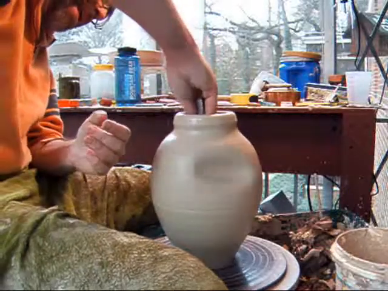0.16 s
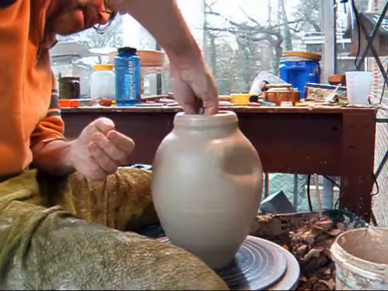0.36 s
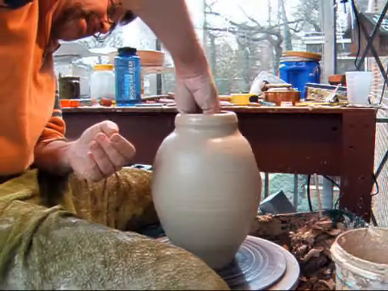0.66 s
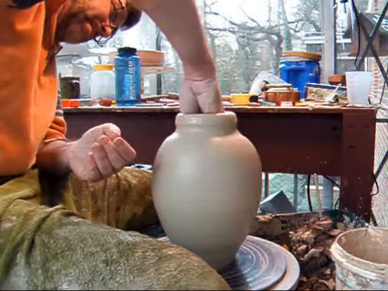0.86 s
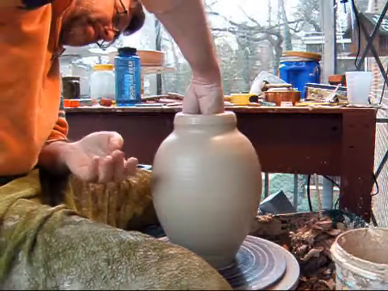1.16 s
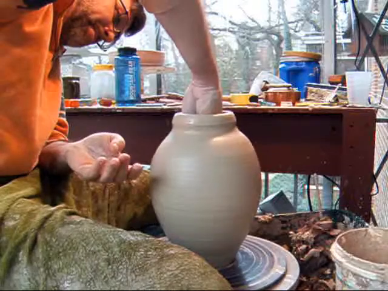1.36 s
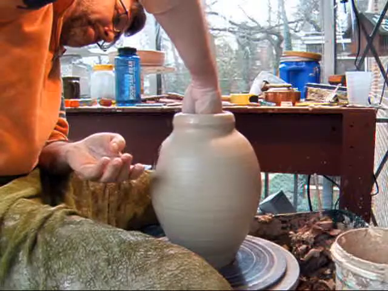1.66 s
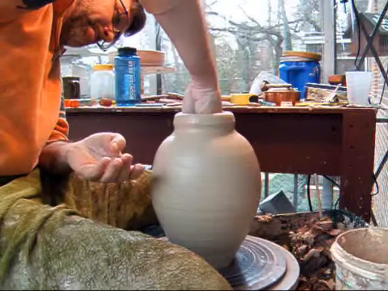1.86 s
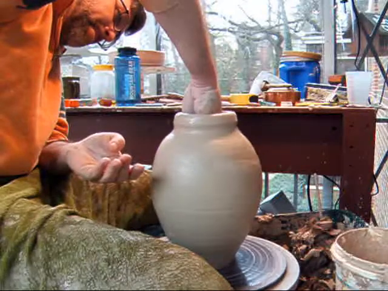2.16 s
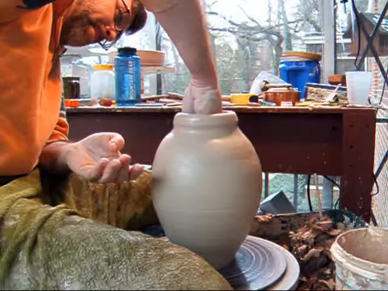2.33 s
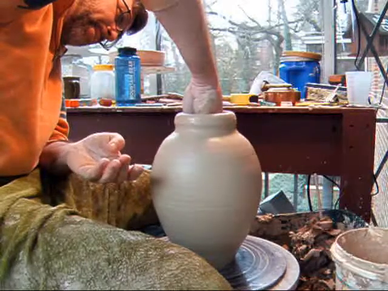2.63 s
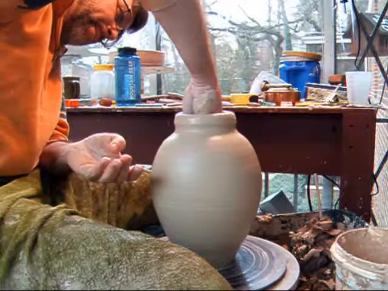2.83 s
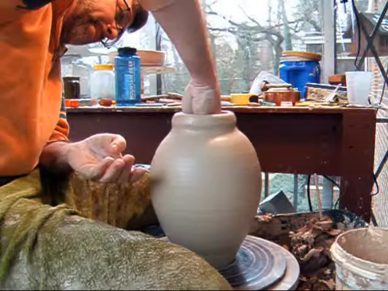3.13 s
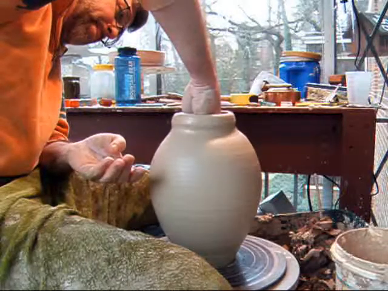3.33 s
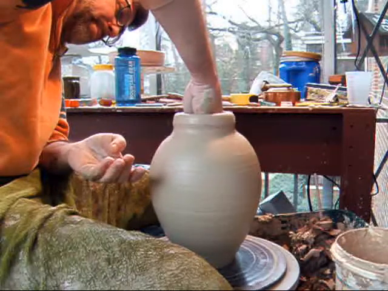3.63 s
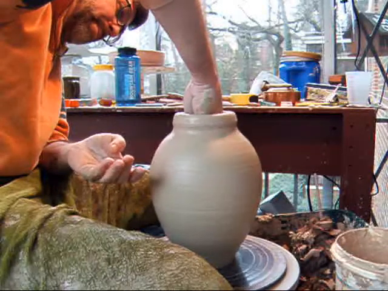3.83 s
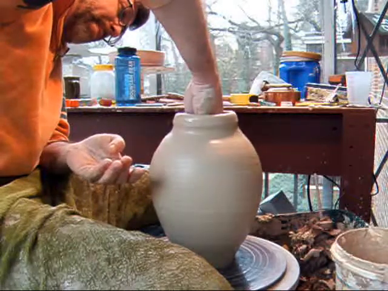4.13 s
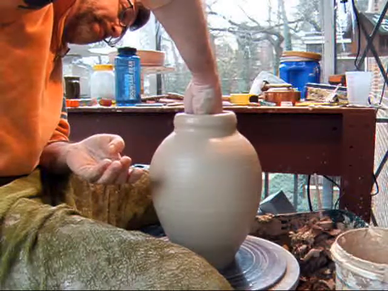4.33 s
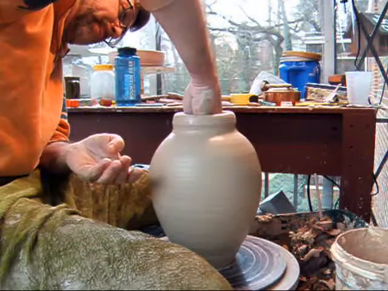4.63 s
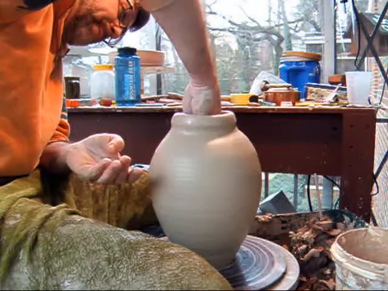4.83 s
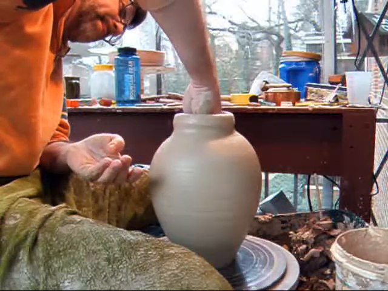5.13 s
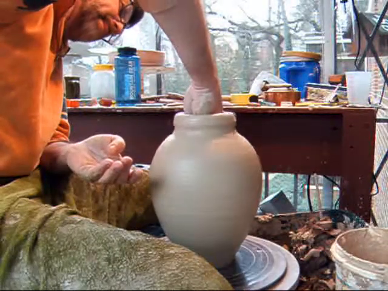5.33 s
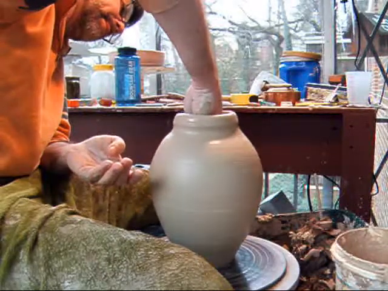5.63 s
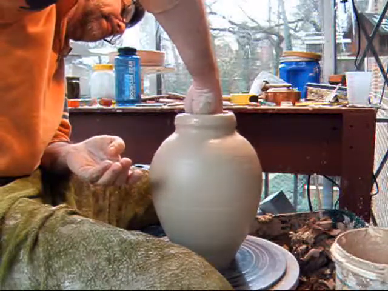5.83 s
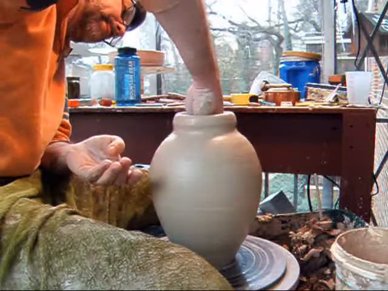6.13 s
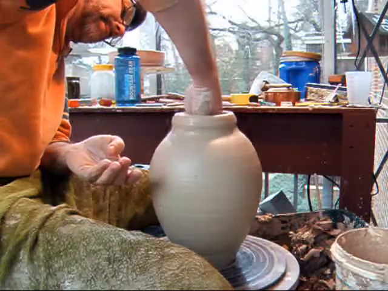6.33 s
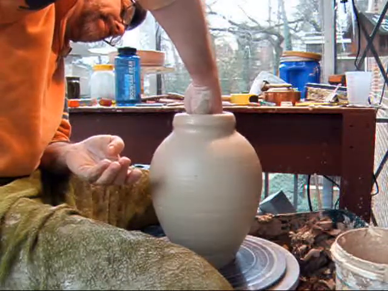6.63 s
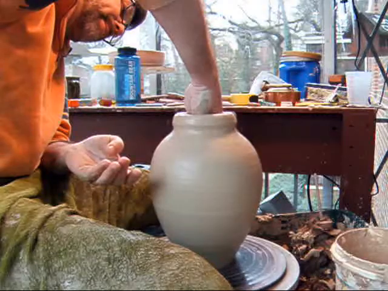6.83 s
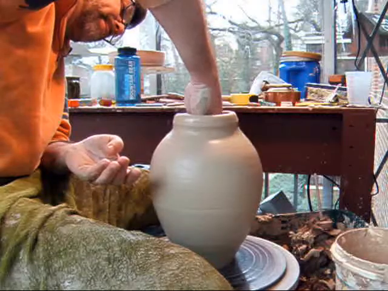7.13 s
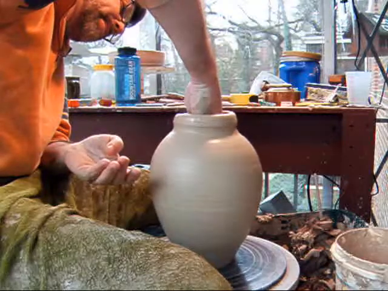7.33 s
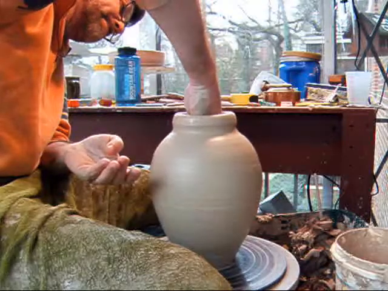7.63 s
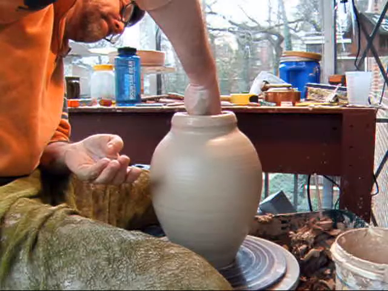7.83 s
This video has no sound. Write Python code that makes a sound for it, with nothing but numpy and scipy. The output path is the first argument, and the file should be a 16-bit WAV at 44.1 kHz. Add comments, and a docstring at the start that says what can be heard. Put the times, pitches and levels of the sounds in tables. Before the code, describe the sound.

An electric pottery wheel hums with a steady low mains buzz and soft whirr, swelling gently each turn, while a faint distant rumble grows late.

```python
"""An electric potter's wheel turns slowly in a quiet workshop while a hand shapes a vase from inside.
Rectified mains current kicks the motor about 120 times a second: a harmonic series, part of which swells
with every turn of the wheel. Filtered noise gives the whirr of the drive, pulsing sines a thin electronic
whine, short noise bursts two faint touches, and low resonant noise a far rumble that dips and then grows."""
import sys
import numpy as np
from scipy import signal
from scipy.fft import rfft, irfft
from scipy.io import wavfile

SR = 44100
rng = np.random.default_rng(int(sys.argv[2]) if len(sys.argv) > 2 else 0)


def file_out(sig):
    """Save sig as 16-bit WAV at sys.argv[1]."""
    # one column per channel
    cols = np.atleast_2d(sig).T
    # limit, then scale
    lim = np.clip(cols, -1, 1)
    pcm = np.round(lim * 32767).astype(np.int16)
    wavfile.write(sys.argv[1], SR, pcm)


N = 352312
TIME = np.arange(N) / SR  # s
BINS = np.fft.rfftfreq(N, 1 / SR)  # Hz
KICK_HZ = 120.03  # rate of the rectified mains pulses


def amp(db):
    """Converts a level in decibels to an amplitude ratio."""
    return 10 ** (np.asarray(db) / 20)


def unit(x):
    """Normalises a signal to an rms of 1."""
    return x / np.sqrt(np.mean(x ** 2) + 1e-30)


def noise(gain):
    """Spectral shaping: white noise weighted by a gain in each frequency bin, at rms 1."""
    spectrum = rfft(rng.standard_normal(N)) * gain
    return unit(irfft(spectrum, N))


def drift(rate_hz):
    """Slow random modulation: noise under a Gaussian low-pass of about the given rate, at rms 1."""
    grid = np.arange(0, 2 * TIME[-1], 1 / 200)
    hz = np.fft.rfftfreq(len(grid), grid[1])
    low_pass = np.exp(-(hz / rate_hz) ** 2)
    slow = irfft(rfft(rng.standard_normal(len(grid))) * low_pass, len(grid))
    return np.interp(TIME, grid, unit(slow))


def bell(hz, width):
    """Resonance curve: gain 1 at the centre and one half at the edges of the width in Hz."""
    return 1 / (1 + ((BINS - hz) / (width / 2)) ** 2)


def ringing(modes):
    """Modal filtering: noise of rms 1 coloured by a sum of resonances."""
    gain = sum(amp(db) * bell(hz, width) for hz, width, db in modes)
    return noise(gain)


def motor(slip_turns=0.0025, waver_db=0.6, waver_hz=9):
    """Periodic excitation: current pulses kick the housing into partials that follow mains, wheel and load."""
    # Partials of the hum. Each row: multiple of the kick rate, rms level in dB before swell and waver.
    partials = [(1, -41.2), (2, -50.1), (3, -38.0), (4, -40.0), (5, -40.2), (6, -67.0), (7, -66.0),
                (8, -55.6), (9, -54.1), (10, -60.5), (11, -67.4), (12, -59.4), (13, -58.2), (14, -58.9),
                (15, -48.5), (16, -68.7), (17, -73.9), (18, -77.7), (19, -70.6), (20, -72.6)]
    # Partials that follow wheel and load. Each row: multiple, depth of the swell in dB, dB per dB of load.
    followers = [(1, -1.8, -0.25), (3, 0, 1.0), (4, 9.7, 1.15)]
    # Load on the motor while the hand shapes the vase. Each row: time in seconds, load in dB.
    load = [(0, -1.2), (1.3, -1.9), (1.8, 0.8), (3.0, -0.5), (3.7, 0.3), (5.3, 0.8), (7.99, 0.3)]
    multiples, level_db = np.transpose(partials)
    swell = wheel_swell()
    load_db = np.interp(TIME, *np.transpose(load))
    swell_db = {round(k): depth_db * swell + follow * load_db for k, depth_db, follow in followers}
    # the lowest partial surges once, briefly
    surge_s, surge_width_s, surge_db = 4.1, 0.08, 1
    swell_db[1] = swell_db[1] + surge_db * np.exp(-((TIME - surge_s) / surge_width_s) ** 2)
    # phase of the kicks in cycles, with a slight slip
    cycles = KICK_HZ * TIME + slip_turns * drift(1.4)
    # frame and room delay the higher partials more, which spreads each kick into a smooth buzz
    smear_rad = 1.06
    phases = causal_phase(level_db) - smear_rad * multiples ** 2
    hum = np.zeros(N)
    for k, db, phase in zip(multiples, level_db, phases):
        gain = amp(db + swell_db.get(k, 0) + waver_db * drift(waver_hz))
        hum += np.sqrt(2) * gain * np.cos(2 * np.pi * k * cycles + phase)
    return hum


def causal_phase(level_db):
    """Minimum phase: the Hilbert transform of log gain gives each harmonic's phase after a sharp kick."""
    log_gain = np.log(amp(np.r_[level_db.min(), level_db, level_db[-1]]))
    # mirrored, so that the spectrum closes into a circle
    circle = np.r_[log_gain, log_gain[-2:0:-1]]
    return -signal.hilbert(circle).imag[1:len(level_db) + 1]


def wheel_swell():
    """Modulation by rotation: a slow rise, a hold and a quicker fall in each turn; height 1, mean 0."""
    # Turns of the wheel. Each entry: start of a turn in seconds.
    turn_starts = [-1.2, 0.62, 2.59, 4.33, 5.87, 7.38, 8.86]
    rise_share, hold_share = 0.49, 0.32  # shares of a turn; the fall takes the rest
    angle = np.interp(TIME, turn_starts, np.arange(len(turn_starts))) % 1
    rise = angle / rise_share
    fall = (1 - angle) / (1 - rise_share - hold_share)
    swell = np.clip(np.minimum(rise, fall), 0, 1)
    return swell - swell.mean()


def whirr(mean_db=-43, swell_db=0.14, rise_db=0.85, pulsing=0.055):
    """Friction noise: belt and bearings rub through the frame's resonances and pulse with motor torque."""
    # Whirr of the drive and hiss of the room. Each row: frequency in Hz, relative density in dB per Hz.
    spectrum = [(25, -18), (50, -16), (85, -2.5), (160, -4), (250, -4.5), (340, 0), (520, -4), (820, -6),
                (1200, -13), (1750, -14.5), (2100, -17), (5500, -21), (8000, -24), (14500, -28.5)]
    # Resonances of the wheel's frame. Each row: frequency in Hz, width in Hz, lift in dB.
    frame = [(191, 11, 2.5), (214, 15, 4.5), (276, 12, -1), (350, 17, 4), (596, 6.4, -8), (836, 6.9, 8.5),
             (1693, 30, 6), (1838, 12, 1.5), (2270, 17, 6.5)]
    hz, db = np.transpose(spectrum)
    colour_db = np.interp(np.log(BINS + 1), np.log(hz), db)
    colour_db += sum(lift * bell(f, width) for f, width, lift in frame)
    torque = 1 + pulsing * np.cos(2 * np.pi * KICK_HZ * TIME)
    # nearly even, a little louder from start to end
    level_db = mean_db + rise_db * (TIME / TIME[-1] - 0.5) + swell_db * drift(6.3)
    return amp(level_db) * torque * noise(amp(colour_db))


def whine(wander_rad=0.7, flutter_db=1.0, swell_db=2.0):
    """Amplitude modulation: high tones pulse with the mains; the more they pulse, the more they swell."""
    # Tones of the electronics. Each row: frequency in Hz, rms level in dB before any modulation,
    # depth of the pulsing at the kick rate as a ratio.
    tones = [(7800, -79, 0), (8200, -78, 0), (10301, -75.5, 0.3), (11621, -77, 1.9), (12581, -76.5, 1.8),
             (13902, -74.5, 0.4), (14201, -67, 0.4), (14441, -79, 1.5), (14921, -79, 1.4),
             (15402, -69.5, 0.1)]
    wander = wander_rad * drift(5)  # shared by all tones
    turn_db = swell_db * wheel_swell()
    ripple = np.cos(2 * np.pi * KICK_HZ * TIME)
    total = np.zeros(N)
    for hz, db, depth in tones:
        gain = amp(db + depth * turn_db) * (1 + depth * ripple)
        total += gain * np.sin(2 * np.pi * (hz * TIME + rng.random()) + wander)
    return np.sqrt(2) * amp(flutter_db * drift(10)) * total


def touches():
    """Transient friction: a small wet tick and a short brush of the hand on clay, as enveloped noise."""
    # Light touches. Each row: time of the peak in seconds, rms level at the peak in dB,
    # rise and decay time constants in seconds.
    contacts = [(0.154, -47.5, 0.001, 0.005), (4.135, -56.5, 0.035, 0.025)]
    # Colour of a touch. Each row: frequency in Hz, width in Hz, relative level in dB.
    touch_modes = [(3200, 500, -5), (6100, 1000, 0), (10200, 1200, -2)]
    push = np.zeros(N)
    for peak_s, db, rise, decay in contacts:
        time_constants = np.maximum((peak_s - TIME) / rise, (TIME - peak_s) / decay)
        push += amp(db) * np.exp(-time_constants)
    return push * ringing(touch_modes)


def rumble():
    """Resonant noise: a far drone, like traffic beyond the windows, fades at first and then grows."""
    # Course of the drone. Each row: time in seconds, rms level in dB.
    course = [(0, -53), (3.6, -76), (4.1, -60), (5.8, -57), (6.7, -51), (6.9, -45), (7.2, -47.5),
              (7.5, -44.5), (7.7, -46), (7.95, -44)]
    # Resonances of the drone. Each row: frequency in Hz, width in Hz, relative level in dB.
    drone_modes = [(97, 15, 0.5), (198, 65, -8), (280, 13, 4.5), (345, 59, -4.5), (408, 30, -6),
                   (665, 130, -6), (768, 18, -2), (1044, 60, -14)]
    level_db = np.interp(TIME, *np.transpose(course))
    return amp(level_db) * ringing(drone_modes)


def scene():
    """Superposition: the pressures of all sources add at one microphone."""
    return (motor() + whirr() + whine() + touches() + rumble())[None]


def record(dry):
    """Band limitation: a linear-phase low-pass cuts off steeply."""
    edge_hz = 15520
    low_pass = signal.firwin(2047, edge_hz, window=("kaiser", 9), fs=SR)
    return signal.oaconvolve(dry, low_pass[None], "same")


dry = scene()
out = record(dry)
file_out(out)
```